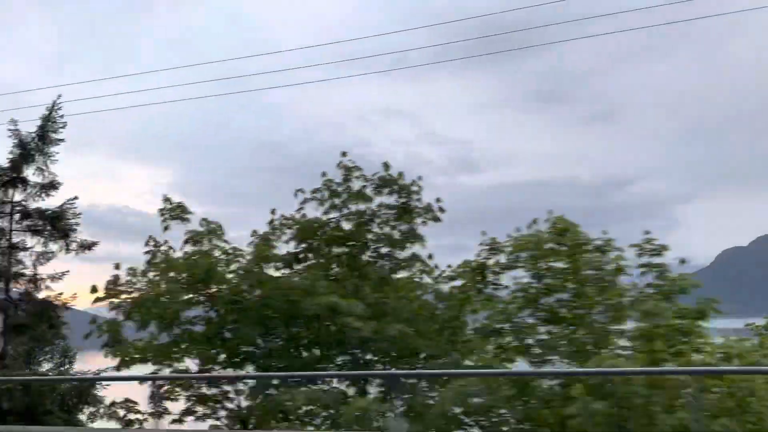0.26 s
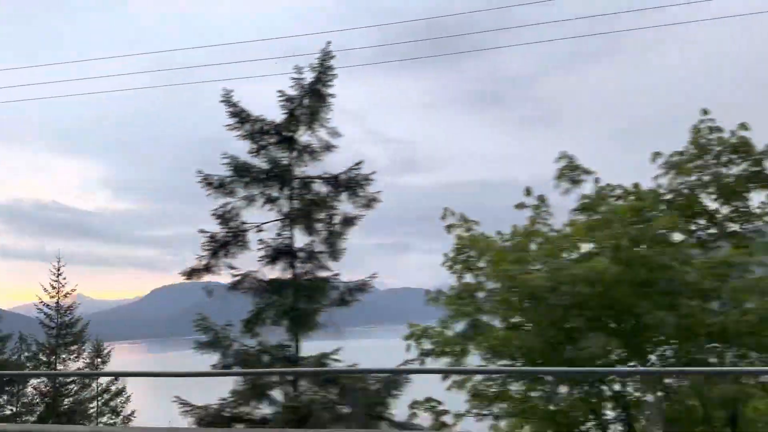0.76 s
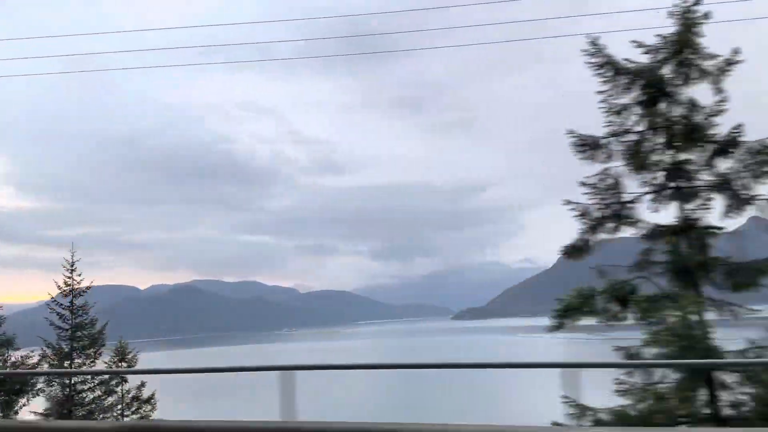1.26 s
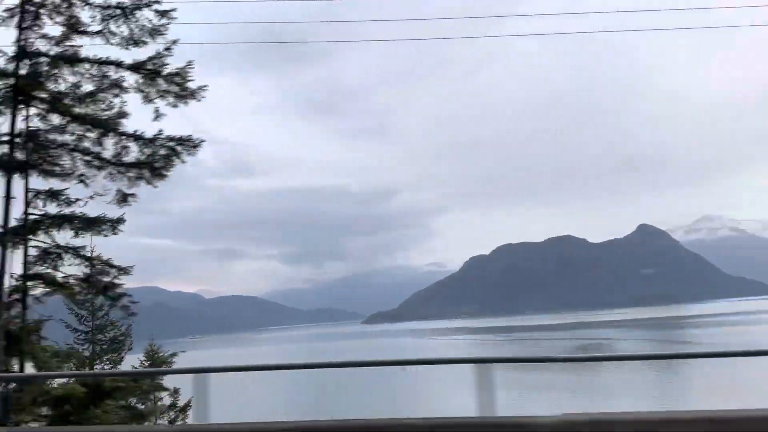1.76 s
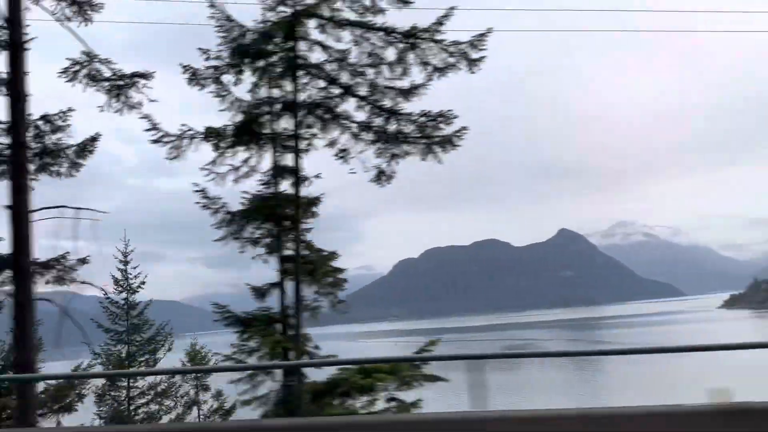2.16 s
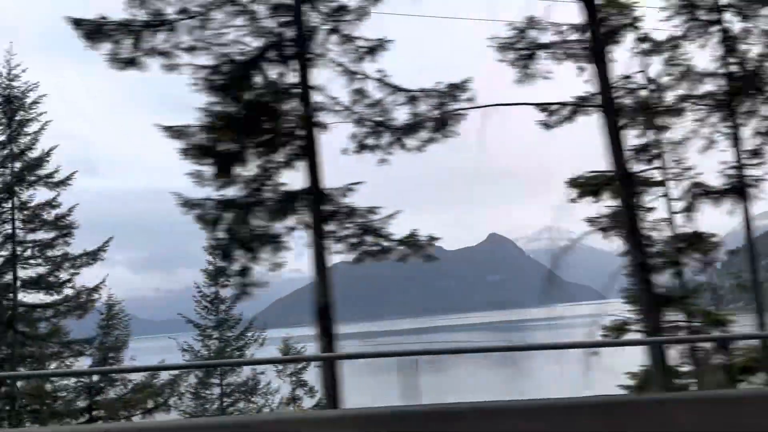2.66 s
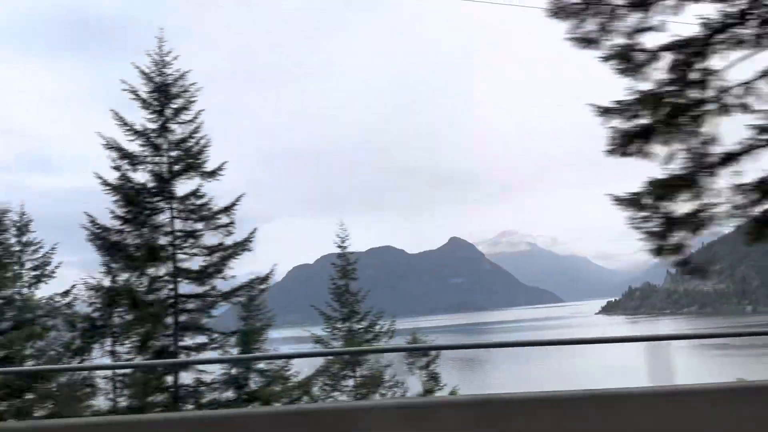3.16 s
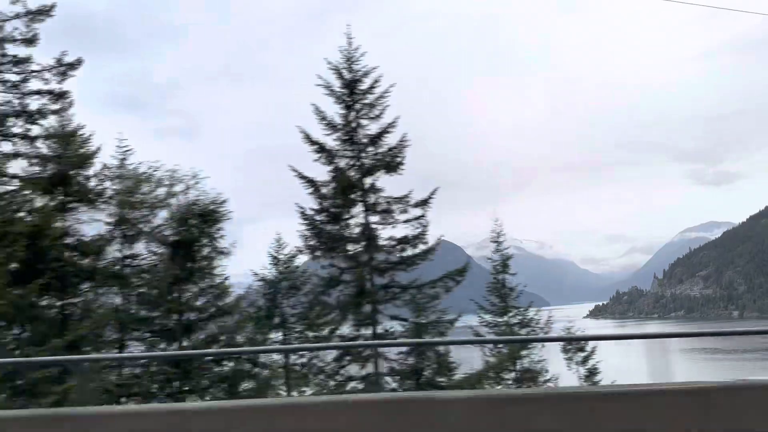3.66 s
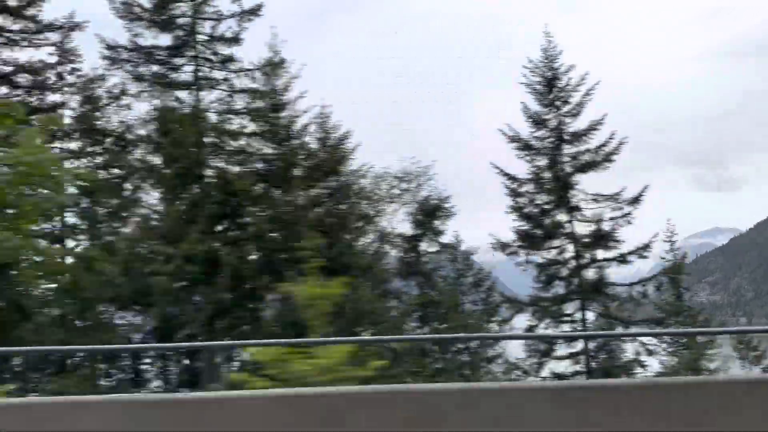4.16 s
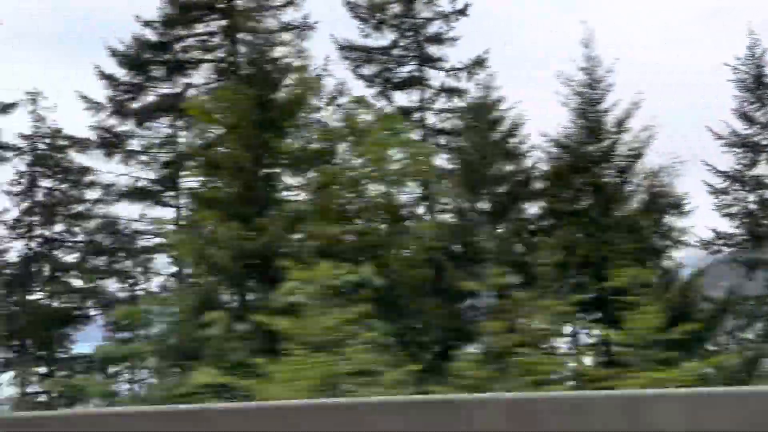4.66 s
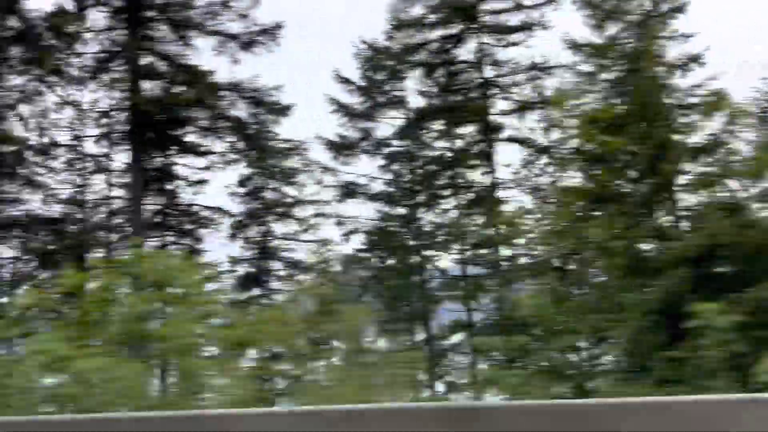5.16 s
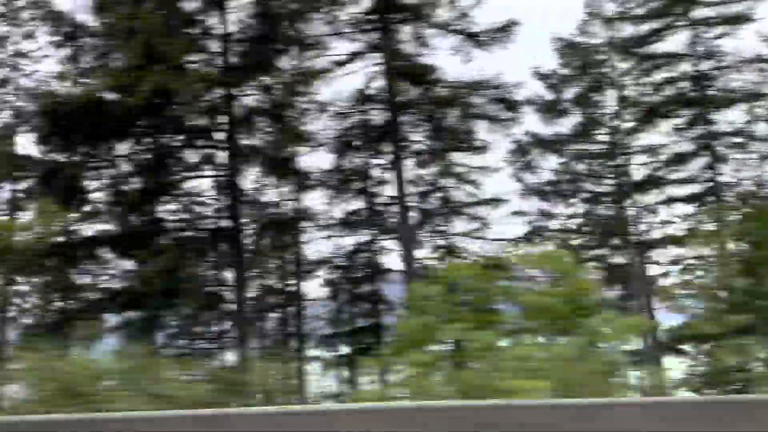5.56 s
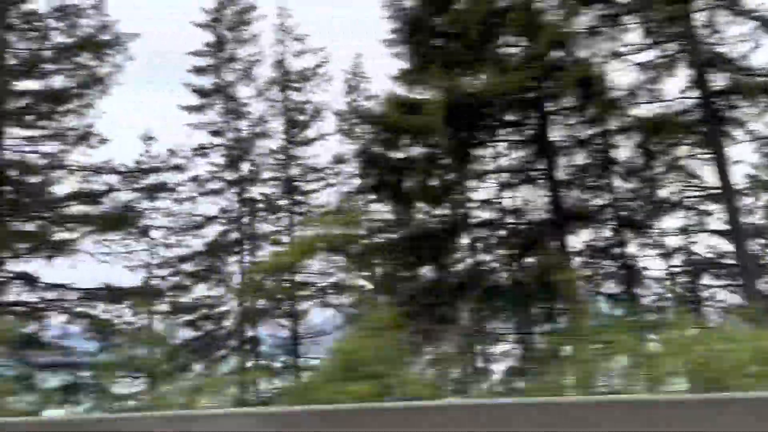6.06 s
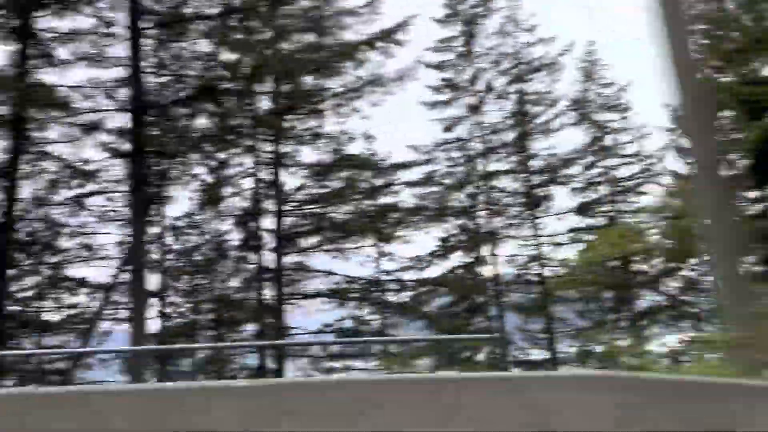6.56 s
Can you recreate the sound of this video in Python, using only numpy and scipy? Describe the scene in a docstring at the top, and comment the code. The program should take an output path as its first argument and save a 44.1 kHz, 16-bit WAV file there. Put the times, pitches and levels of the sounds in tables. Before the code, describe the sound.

A car travels at highway speed, tyres roaring and air hissing, while gusts through the open window buffet and pop on the microphone.

```python
"""Wind at an open car window

A phone is held at the open side window of a car at highway speed. The tyres roar off the road and
the roadside barrier, and the air stream hisses along the body, with a crisp patter and a few thin
ticks. Turbulence buffets the two microphone ports: eddies boom and flutter in lumps, pressure slaps
thump, and eddies that burst on a port make sharp pops."""
import sys
import numpy as np
from scipy import signal
from scipy.fft import rfft, irfft, next_fast_len
from scipy.io import wavfile
from scipy.ndimage import uniform_filter1d, map_coordinates

SR = 44100
rng = np.random.default_rng(int(sys.argv[2]) if len(sys.argv) > 2 else 0)


def store_pcm(level_fs):
    """Save levels as 16-bit WAV."""
    pcm = np.round(np.clip(level_fs, -1, 1) * 32767).astype(np.int16)
    wavfile.write(sys.argv[1], SR, np.atleast_2d(pcm).T)


N = 299880


def amp(db):
    """Amplitude ratio of a level in decibels."""
    return 10 ** (np.asarray(db) / 20)


def unit(x):
    """Normalisation to rms 1."""
    return x / np.sqrt(np.mean(x ** 2) + 1e-20)


def along(rows, hz):
    """Interpolation of (f/Hz, value, ...) rows on a logarithmic frequency axis."""
    f, *columns = np.transpose(rows)
    return np.array([np.interp(np.log(hz + 1), np.log(f + 1), c) for c in columns])


def curves(rows):
    """Linear interpolation of (t/s, value, ...) rows at every sample."""
    t, *columns = np.transpose(rows)
    return [np.interp(np.arange(N) / SR, t, c) for c in columns]


def wobble(knots_per_s):
    """Smooth random modulation: a spline through Gaussian values."""
    knots = rng.standard_normal(int(N * knots_per_s / SR) + 4)
    return map_coordinates(knots, [np.arange(N) * knots_per_s / SR])


def filtered(x, response):
    """Linear filtering: the spectrum is multiplied by a complex frequency response."""
    size = next_fast_len(N + 8192)
    return irfft(rfft(x, size) * response(np.fft.rfftfreq(size, 1 / SR)), size)[..., :N]


def below(x, edge_hz):
    """Zero-phase low-pass, falling 36 dB per octave."""
    return filtered(x, lambda hz: 1 / (1 + (hz / edge_hz) ** 6))


def tinted(x, spectrum):
    """Spectral shaping that conserves the power of white noise and cuts off at the last row."""
    gain = lambda hz: amp(along(spectrum, hz)) * (hz < spectrum[-1][0])
    return filtered(x, lambda hz: unit(gain(hz)))


def noise(spectrum, patchy_db=0):
    """Two uncorrelated coloured noises of rms 1; patchy_db modulates both in time and frequency."""
    pair = rng.standard_normal((2, N))
    if patchy_db:
        cells = signal.stft(pair, nperseg=512)[2]
        patches = uniform_filter1d(rng.standard_normal(cells.shape[1:]), size=5, axis=0)
        patches = uniform_filter1d(patches, size=8, axis=1)
        pair = signal.istft(cells * amp(patchy_db * unit(patches)), nperseg=512)[1][:, :N]
    return unit(tinted(pair, spectrum))


def steady(x):
    """Division by the Hilbert envelope flattens noise, so that a short puff of it always sounds."""
    return x / np.abs(signal.hilbert(x, next_fast_len(N))[..., :N])


def puffs(times, level_db, pan_db, rise_s):
    """Stereo envelope by convolution of impulses with a smooth pulse; pan is left minus right."""
    impulses = np.zeros((2, N))
    onsets = np.clip(np.round(np.asarray(times) * SR).astype(int), 0, N - 1)
    np.add.at(impulses, (slice(None), onsets), amp(level_db + np.outer([.5, -.5], pan_db)))
    age = np.arange(round(4 * rise_s * SR)) / SR / rise_s
    pulse = (age * np.exp(1 - age)) ** 3
    return signal.fftconvolve(impulses, pulse[None], axes=1)[:, :N]


def ports(pair):
    """Partial coherence: two ports share part of a sound, with phase and level set by the phone's body below
    about 9 kHz; in the high treble the phase between the ports swings strongly."""
    # relation between the ports: f/Hz, coherence (0-1), phase lead of the right/rad, pan/dB
    relation = [(40, 0.79, -0.1, -7), (152, 0.84, -0.04, -1.5), (330, 0.49, .5, -3.5), (440, 0, 0.36, 1),
                (798, 0.69, -1.5, 5), (1310, 0.01, -0.22, -3), (1682, 0.54, 3.5, -3.5), (1960, 0.16, 8, 0),
                (2620, 1, 4.5, -1), (7160, 0.16, 6, 4.5), (8020, 1, 0, 0), (9700, 0.93, 2, 0),
                (12660, 1, 4, -1), (13200, 1, 0, 0.5)]
    size = next_fast_len(N + 8192)
    shared, own = rfft(pair, size)
    coherence, lead, pan_db = along(relation, np.fft.rfftfreq(size, 1 / SR))
    angle = np.arccos(np.clip(coherence, 0, 1)) / 2
    left = (np.cos(angle) * shared + np.sin(angle) * own) * amp(pan_db / 2) * np.exp(-.5j * lead)
    right = (np.cos(angle) * shared - np.sin(angle) * own) * amp(-pan_db / 2) * np.exp(.5j * lead)
    return irfft([left, right], size)[:, :N]


def road_rush():
    """Rolling noise of the tyres and flow noise on the body, grainy from a common amplitude modulation."""
    # course of the rush: t/s, roar level/dB, gain of its lower part/dB, hiss level/dB, treble level/dB
    levels = [(0.0, -26, -8, -46.5, -61.5), (1.63, -29.5, -1, -46.5, -60.5), (2.06, -36, 6.5, -49, -64),
              (2.42, -32, 3, -47, -58.5), (4.73, -32, 4, -46.5, -61.5), (6.8, -28.5, 0, -46, -60)]
    # spectra of tyre roar and air hiss: f/Hz, density level/dB
    tyre_spectrum = [(300, -8), (560, -4), (720, -4.5), (880, 1), (1050, 3), (1300, -2), (1600, -2.5),
                     (1800, -15), (2300, -22.5), (4000, -42)]
    hiss_spectrum = [(800, -21), (1800, -3), (2250, -3.5), (2550, -0.5), (2800, -4), (3900, -9),
                     (4600, -8.5), (5200, -10), (7400, -14.5), (8300, -12), (10100, -13.5), (10800, -46),
                     (11900, -41.5), (12500, -16.5), (15900, -27)]
    roar_db, lower_db, hiss_db, treble_db = curves(levels)
    grain = wobble(45)
    roar = unit(amp(2.15 * grain) * noise(tyre_spectrum, patchy_db=2.0))
    lower_gain = amp(lower_db + 2.35 * wobble(12))
    roar = roar + (lower_gain - 1) * below(roar, edge_hz=1110)
    hiss = amp(0.73 * grain + 0.18 * wobble(5.5)) * noise(hiss_spectrum, patchy_db=1.82)
    low_hiss = below(hiss, edge_hz=7480)
    treble = hiss - low_hiss
    return amp(roar_db) * roar + amp(hiss_db) * unit(low_hiss) + amp(treble_db) * unit(treble)


def chatter(puffs_per_s=25):
    """Pulse-modulated noise in the band of the roar: a loosely regular patter, mostly on the right."""
    # the loudest puffs: t/s, level/dB
    accents = [(0.135, -18), (0.167, -16.5), (0.435, -13.5), (0.478, -19), (0.971, -19), (1.053, -13.5),
               (1.083, -15.5), (1.378, -13.5), (1.441, -18), (1.72, -19.5), (1.948, -22), (2.661, -21),
               (5.411, -15), (5.827, -16.5), (6.042, -18.5), (6.148, -17.5), (6.234, -16)]
    # spectrum of a puff: f/Hz, density level/dB
    spectrum = [(250, -21), (600, -1), (1500, -2.5), (3500, -27)]
    jitter, weakness, side = rng.random((round(puffs_per_s * N / SR), 3)).T
    times = (np.arange(len(jitter)) + jitter) / puffs_per_s
    envelope = puffs(times, -23 - 3.45 * np.log(weakness + .1), 8 * side - 6, rise_s=0.0028)
    times, level_db = np.transpose(accents)
    envelope += puffs(times, level_db + 1, pan_db=np.full(len(times), -3), rise_s=0.0027)
    return below(envelope * steady(ports(noise(spectrum))), edge_hz=1830)


def ticks():
    """Very short bursts of treble noise are heard as thin clicks."""
    # ticks: t/s, level/dB, pan/dB
    events = [(0.815, -42, -11), (4.291, -38.5, -17.5), (5.1632, -40, -22), (5.431, -34.5, -2)]
    times, level_db, pan_db = np.transpose(events)
    bright = steady(noise([(2000, -14.0), (7000, -11.5), (8500, -1.0), (12000, -25)]))
    return puffs(times, level_db, pan_db, rise_s=0.00081) * (bright[0] + 0.77 * bright)


def buffeting():
    """Turbulent pressure: large eddies boom and small ones flutter, in lumps that partly coincide."""
    # wind on the ports: t/s, boom level/dB, deepest boom level/dB, flutter level/dB
    gusts = [(0.0, -22, -32, -27), (0.58, -21, -41, -29), (1.0, -21, -35.5, -27.5), (1.15, -18, -30, -22),
             (1.6, -17.5, -31, -24.5), (1.95, -18, -19.5, -24.5), (2.21, -21.5, -25, -29),
             (2.8, -19, -13.5, -28), (2.9, -20.5, -32, -28), (3.07, -24, -24, -23.5),
             (3.18, -21, -32.5, -28.5), (3.75, -18.5, -20, -31.5), (3.94, -27, -28.5, -35),
             (4.24, -22.5, -21, -28.5), (4.89, -28, -34.5, -37), (5.21, -28, -12, -32.5),
             (5.32, -27.5, -29, -29.5), (5.89, -24.5, -20.5, -32), (6.8, -24.5, -29.5, -31.5)]
    # eddy spectra, from large to small: f/Hz, density level/dB
    deep_spectrum = [(12, -19), (26, -18.5), (38, 4.5), (52, 0.5), (70, 0.5), (110, -51)]
    boom_spectrum = [(30, -38), (60, 0.5), (105, -3), (134, 0), (158, -5.5), (200, -6), (320, -20.5),
                     (600, -78.5)]
    flutter_spectrum = [(80, -50), (150, -13), (250, -2.5), (348, 1), (385, -3), (480, -5), (700, -19.5),
                        (1100, -18.5), (1700, -21), (3000, -85)]
    boom_db, deep_db, flutter_db = curves(gusts)
    lumps = wobble(22)
    deep = unit(amp(0.97 * lumps) * noise(deep_spectrum))
    boom = unit(amp(2.6 * lumps) * noise(boom_spectrum))
    flutter = unit(amp(1.2 * lumps + 2.35 * wobble(70)) * noise(flutter_spectrum))
    return amp(boom_db) * boom + amp(deep_db) * deep + amp(flutter_db) * flutter


def thumps(rise_cycles=0.86, octave_db=-8.5, pan_db=-4.5):
    """A pressure slap is a damped oscillation of two or three cycles, in phase at both ports."""
    # pressure slaps: t/s, level/dB, f/Hz
    slaps = [(0.337, -10.5, 177), (1.135, -5.5, 132), (1.339, -10, 179), (1.461, -9.5, 61),
             (1.935, -4, 264), (2.021, -9.5, 57.7), (2.629, -2, 157), (2.804, -11, 133), (2.921, -10, 259),
             (3.007, -8, 104), (3.09, -11, 140), (3.292, -8, 129), (3.7139, -3, 210), (4.214, -9, 134),
             (4.614, -6, 190), (4.715, -6.5, 135), (5.397, -4.5, 170), (5.4043, -6, 394),
             (5.569, -8, 111.5), (6.139, -9.5, 121), (6.533, -8, 101.6)]
    pressure = np.zeros(N + SR)
    t = np.arange(SR // 20) / SR
    for start, level_db, hz in slaps:
        age = t * hz / rise_cycles
        phase = 2 * np.pi * hz * t
        swing = (np.sin(phase) + amp(octave_db) * np.cos(2 * phase)) * (age * np.exp(1 - age)) ** 2
        pressure[round(start * SR):][:len(t)] += amp(level_db) * swing / np.abs(swing).max()
    return pressure[:N] * amp([[pan_db / 2], [-pan_db / 2]])


def pops(snap_lag_s_per_khz=0.0002):
    """An eddy bursting on a port is a noise transient: a dull puff, a sharp snap and a churning wake."""
    # bursts: t/s, level/dB, snap re that level/dB, pan/dB, upper over lower band of the dull puff/dB
    bursts = [(0.392, -13.5, -20, -13, 15), (0.815, -15, -20, -11, 19), (1.122, -12.5, -22.5, -8, 11),
              (1.939, -6, -14, -1, 17.5), (2.674, -6, -29.5, -1, -5), (3.017, -4.5, -27, -1.5, -3),
              (3.131, -12.5, -19, 0.5, 4), (3.306, -4, -33, 4, -7), (3.647, -10.5, -18, 6.5, 12),
              (3.653, -19.5, -8.5, 9, 2), (3.721, -4.5, -21.5, 3, 5), (3.736, -15, -9, -3, 8),
              (3.798, -7.5, -30.5, 2.5, 3), (3.8647, -6.5, -15, 2, 8), (4.099, -10.5, -46, 2.5, -12.5),
              (4.177, -15.5, -15, 3, 3), (4.197, -12, -42, 5, -2), (4.224, -13, -22.5, 6, -14),
              (4.488, -12, -25, 8, 9), (4.736, -11, -14.5, 0.5, -12), (5.407, -9, -15, -2, 0),
              (5.429, -11, -6.5, 3.5, 2), (5.663, -18.5, -17, 10, 5), (6.579, -13.5, -31, 3, 13)]
    # spectra of the snap and of the dull puff and wake: f/Hz, density level/dB
    snap_spectrum = [(700, -14.5), (1100, 1.5), (2300, -1.5), (2900, -10), (4200, -17.5), (6000, -22.5),
                     (8000, -41.5)]
    dull_spectrum = [(150, -8), (380, 0.5), (750, 0), (1400, -5), (2200, -40.5)]
    times, level_db, relative_db, pan_db, tilt_db = np.transpose(bursts)
    wake = puffs(times - 0.01, level_db - 10, pan_db, rise_s=0.016) * amp(4.9 * wobble(130) - 2.5)

    snap_db = level_db + relative_db
    narrow_pan_db = 0.4 * pan_db
    snap_pan_db = narrow_pan_db + 4.5  # the snap spreads less than the dull puff and leans left
    crack = puffs(times + 0.00045, snap_db, snap_pan_db, rise_s=0.0013)
    fizz = puffs(times - 0.016, snap_db - 14, narrow_pan_db, rise_s=0.014)
    pressure_pulse = puffs(times + 0.001815, snap_db + 8.9, snap_pan_db, rise_s=0.00007)
    air = steady(rng.standard_normal((2, N)))
    snap = tinted(pressure_pulse + (crack + fizz) * (air[0] + 0.47 * air), snap_spectrum)
    # dispersion: the group delay rises with frequency, through zero at 2 kHz
    snap = filtered(snap, lambda hz: np.exp(-1j * np.pi * snap_lag_s_per_khz * hz * (hz / 1000 - 4)))

    churn = ports(noise(dull_spectrum))
    low_churn = below(churn, edge_hz=620)
    upper_puff = puffs(times - 0.0015, level_db + tilt_db / 2 - 8, pan_db, rise_s=0.0025)
    lower_puff = puffs(times - 0.0015, level_db - tilt_db / 2 - 3, pan_db, rise_s=0.0025)
    dull = lower_puff * steady(low_churn) + upper_puff * steady(churn - low_churn)
    dull = below(dull, edge_hz=np.array([[1500], [2000]]))  # the left port sits deeper: darker
    return snap + dull + below(wake * ports(noise(dull_spectrum)), edge_hz=940)


def scene():
    """Superposition of wind and road noise at the two ports."""
    return ports(buffeting() + road_rush()) + thumps() + pops() + chatter() + ticks()


def record(dry):
    """Soft saturation rounds the peaks near full scale; a band limit follows."""
    ceiling, top_hz = 0.98, 15700
    rounded = dry / (1 + np.abs(dry / ceiling) ** 6) ** (1 / 6)
    return filtered(rounded, lambda hz: hz < top_hz)


dry = scene()
out = record(dry)
store_pcm(out)
```